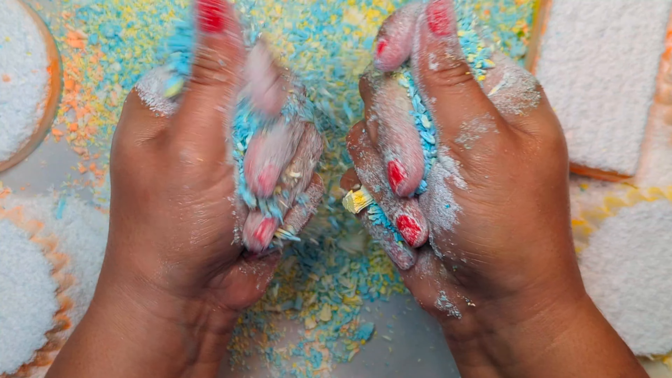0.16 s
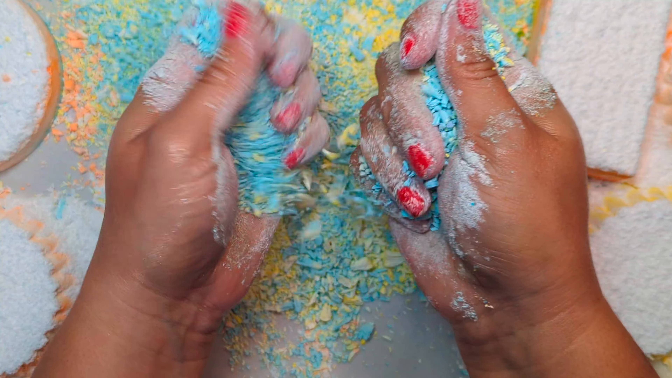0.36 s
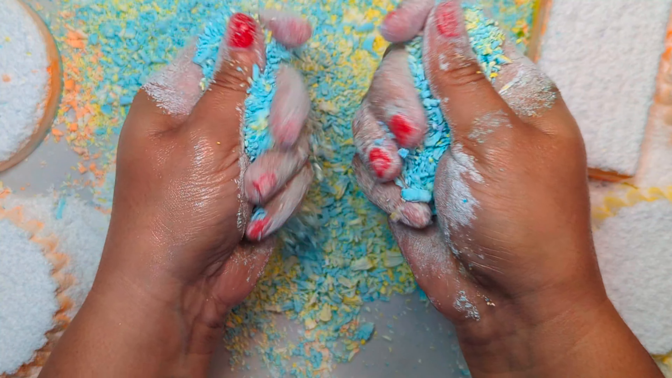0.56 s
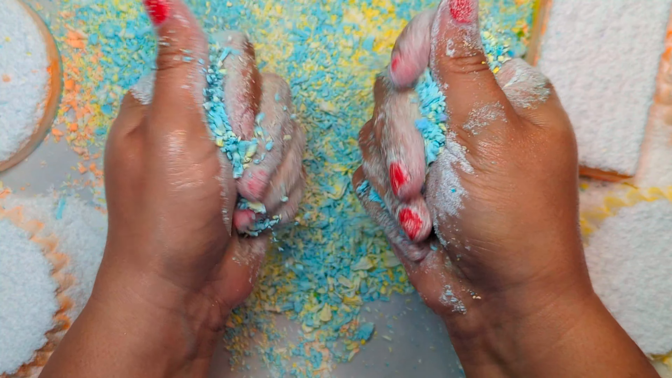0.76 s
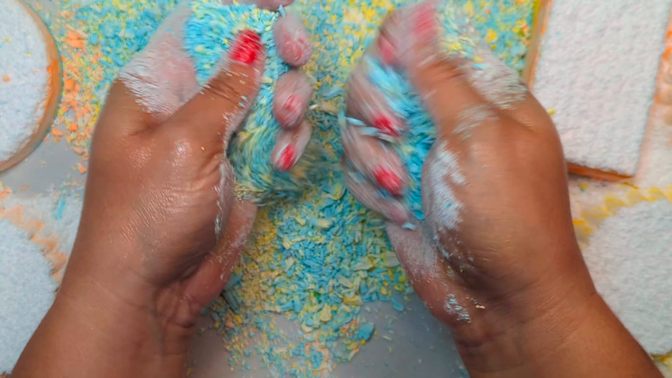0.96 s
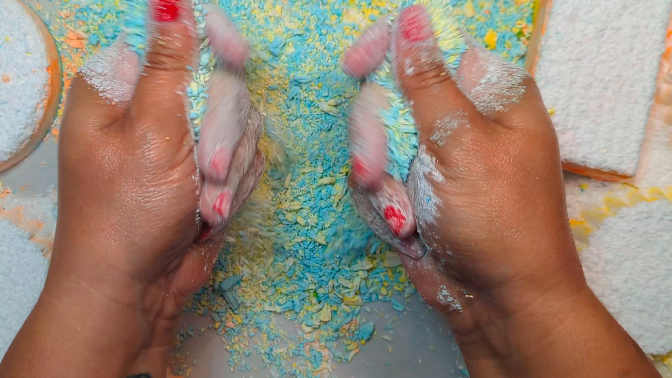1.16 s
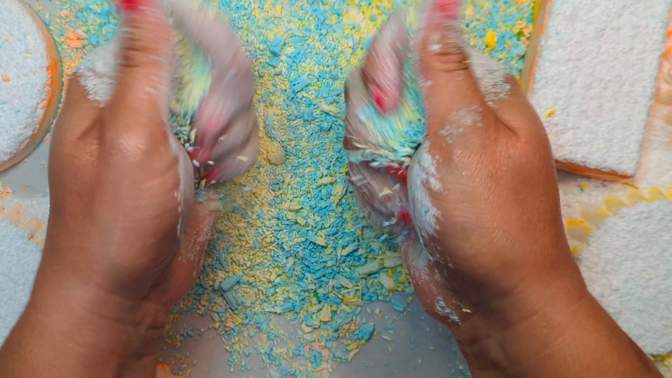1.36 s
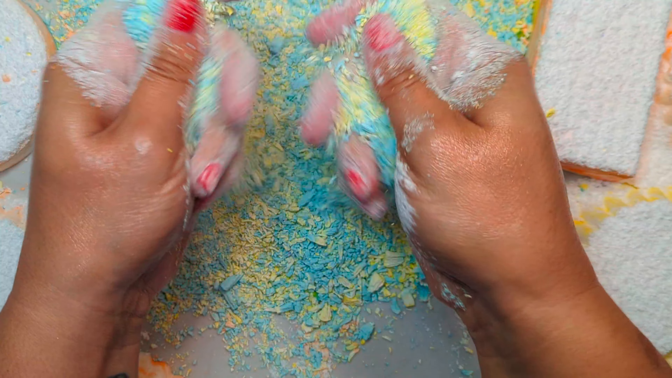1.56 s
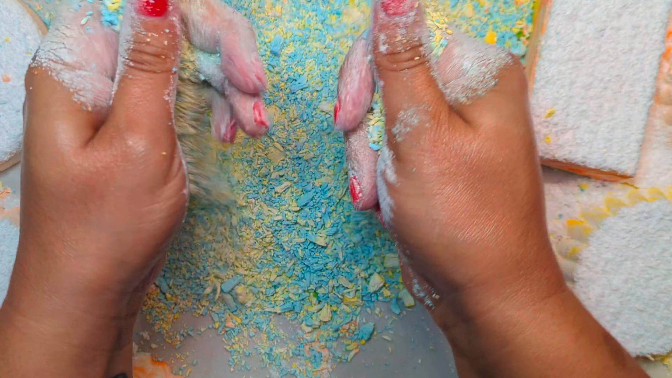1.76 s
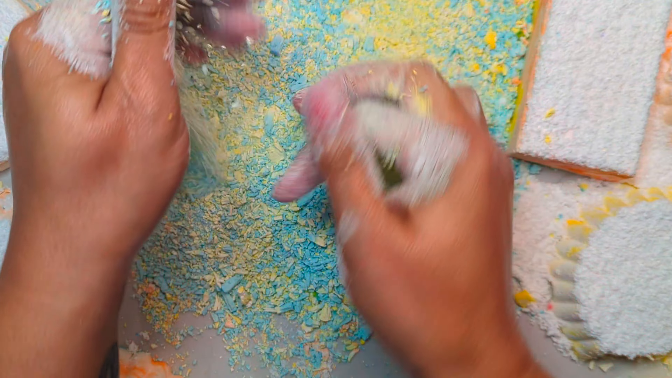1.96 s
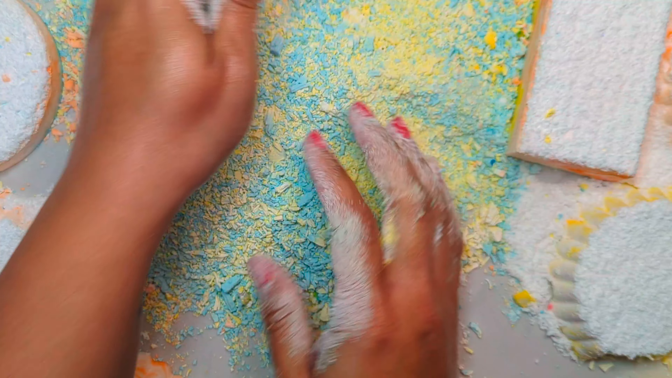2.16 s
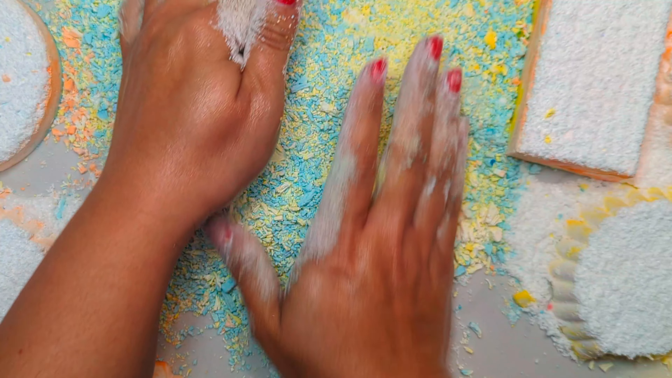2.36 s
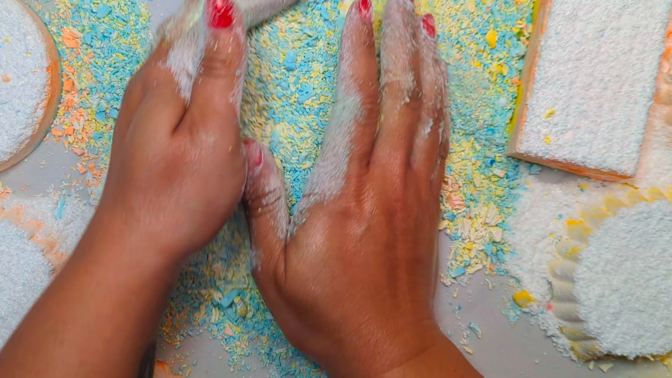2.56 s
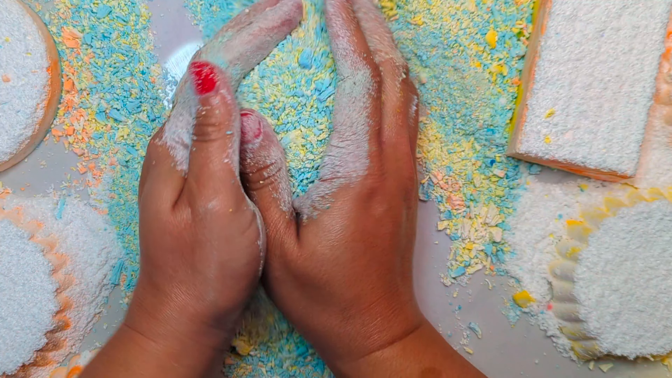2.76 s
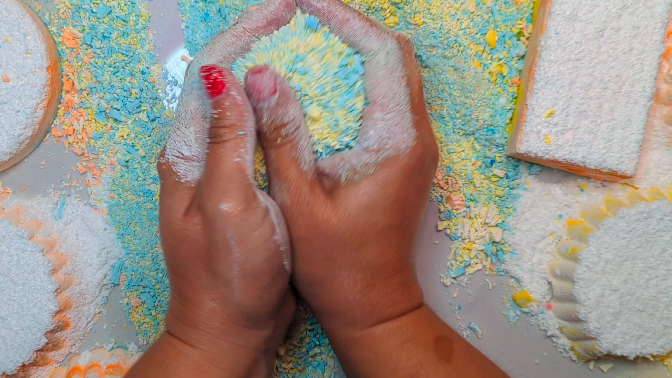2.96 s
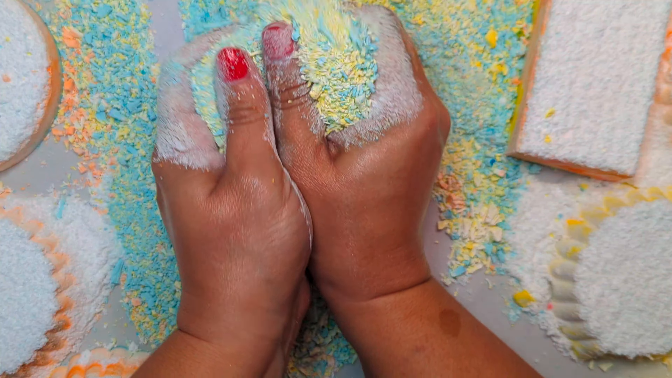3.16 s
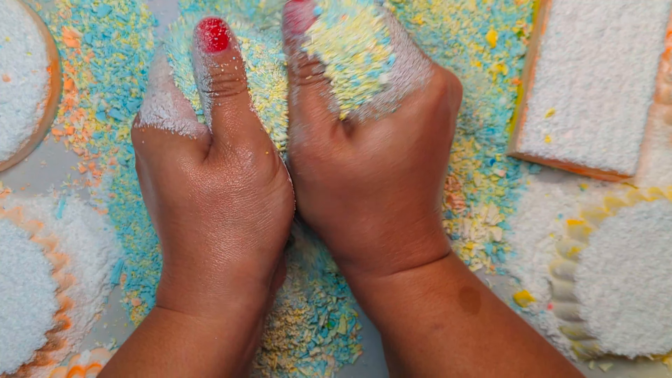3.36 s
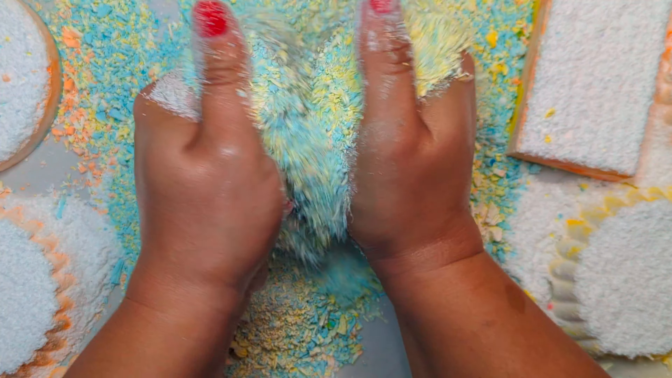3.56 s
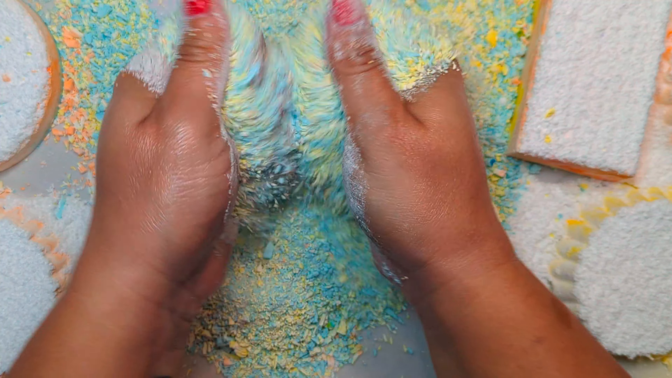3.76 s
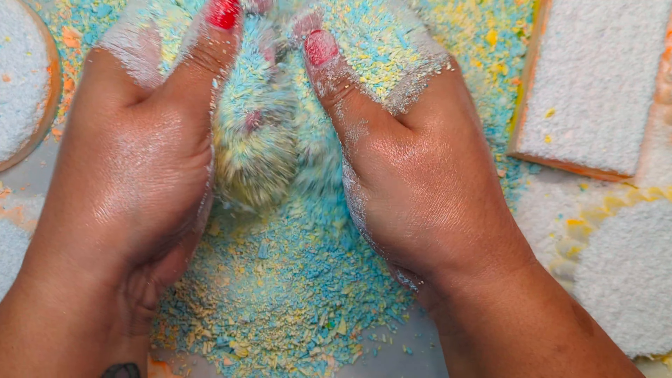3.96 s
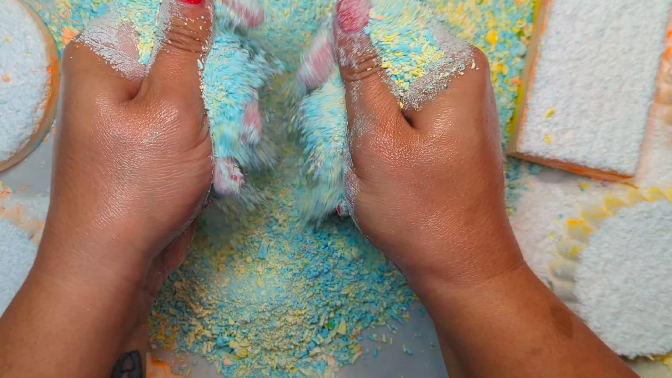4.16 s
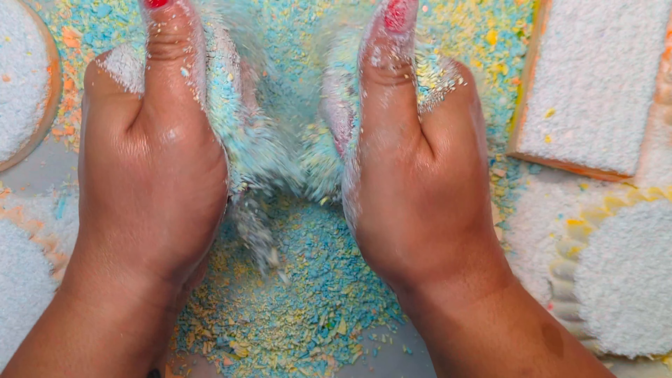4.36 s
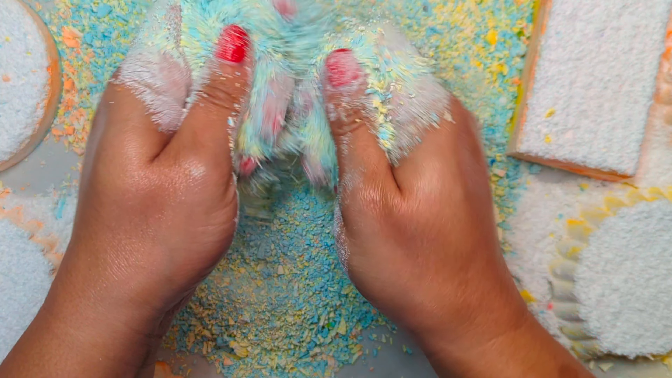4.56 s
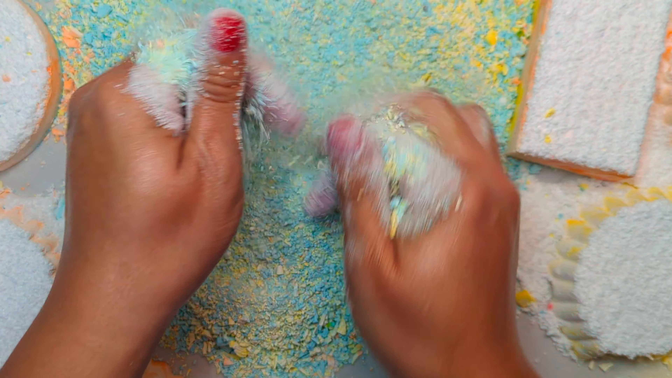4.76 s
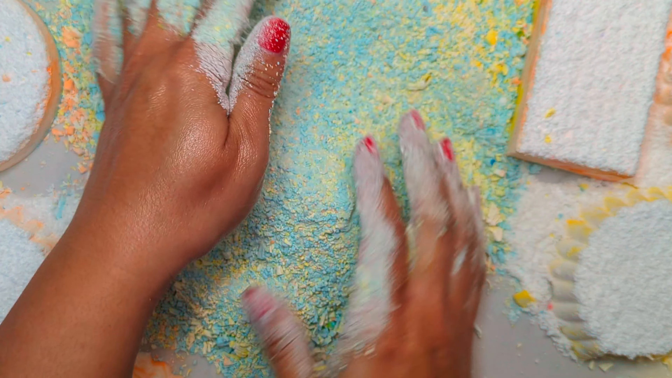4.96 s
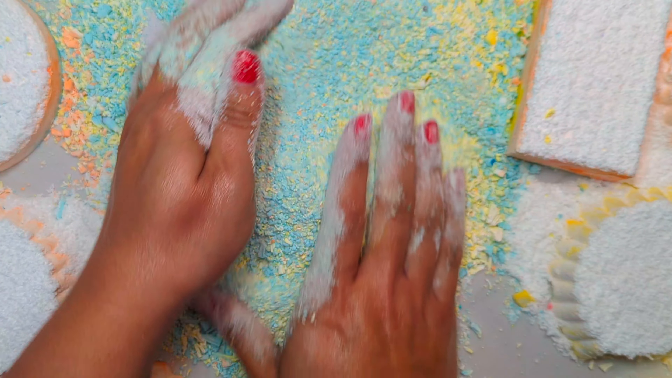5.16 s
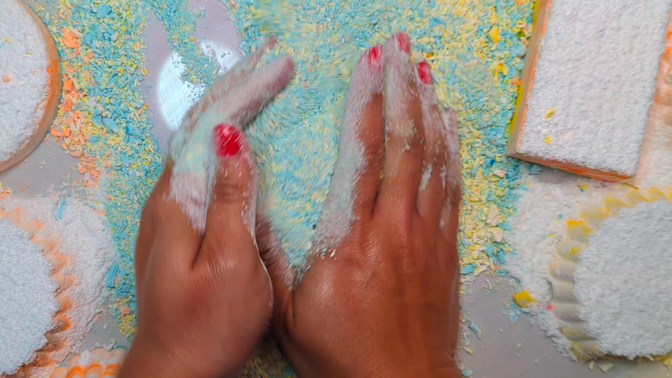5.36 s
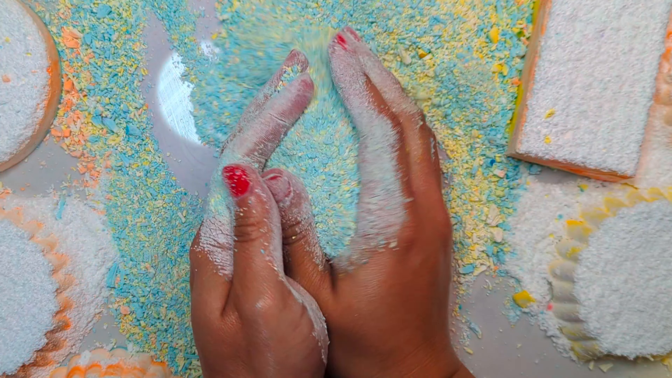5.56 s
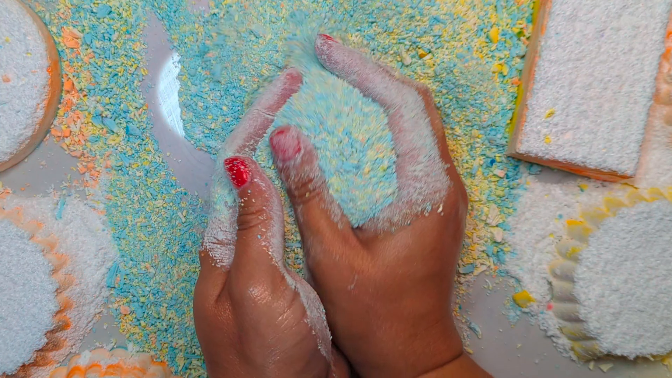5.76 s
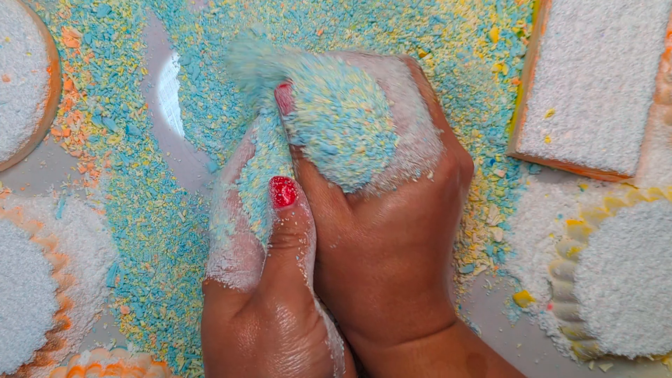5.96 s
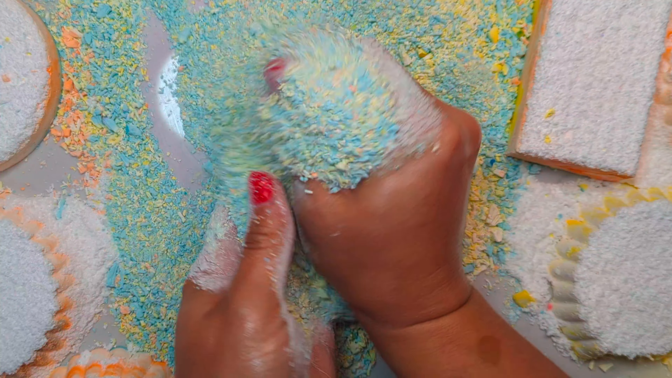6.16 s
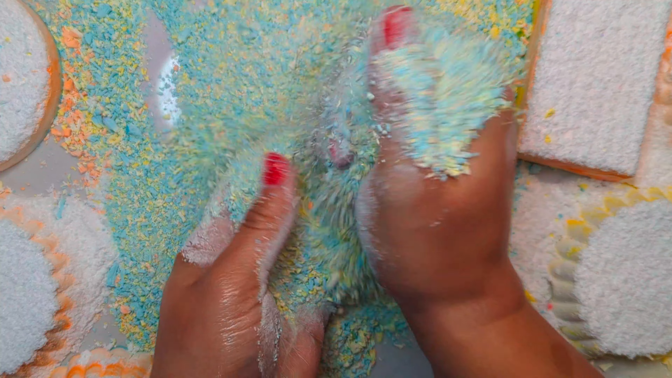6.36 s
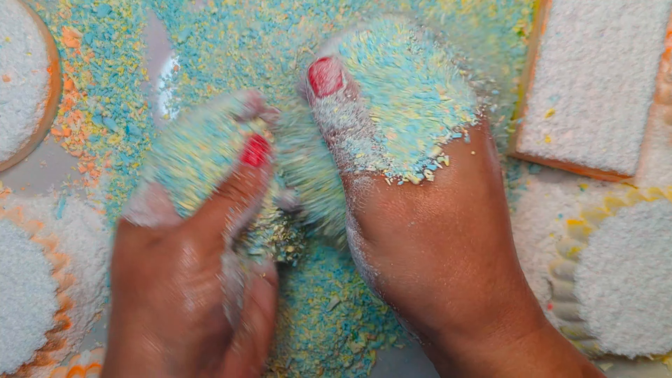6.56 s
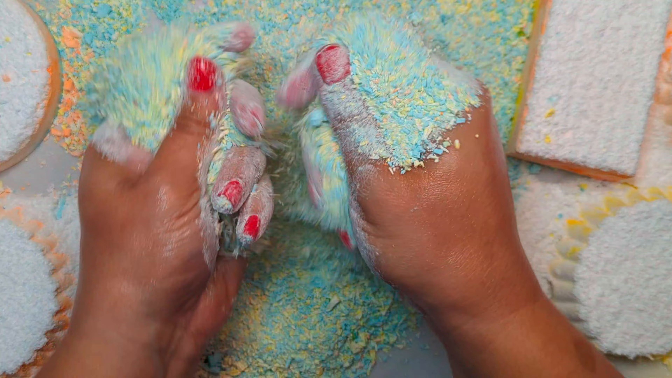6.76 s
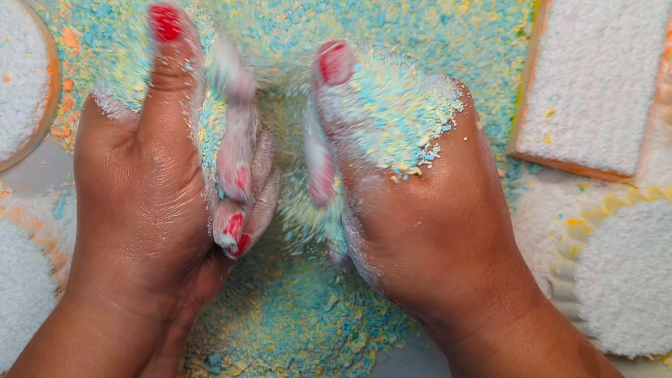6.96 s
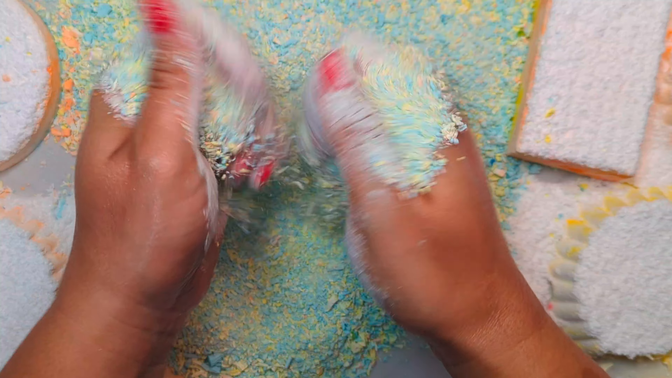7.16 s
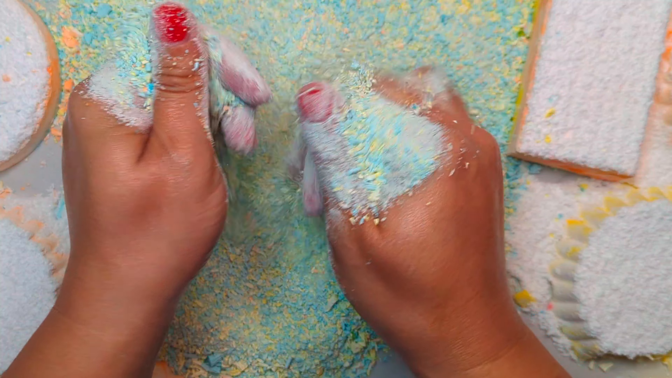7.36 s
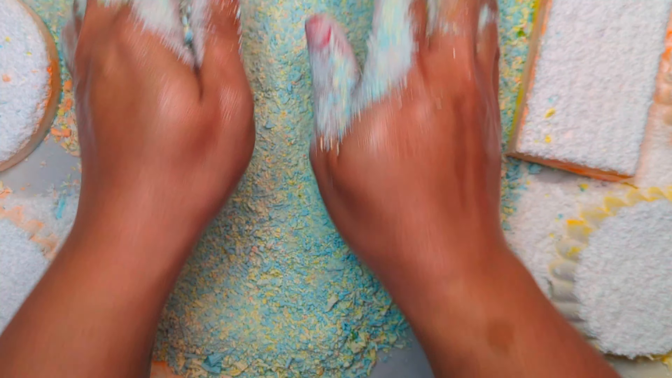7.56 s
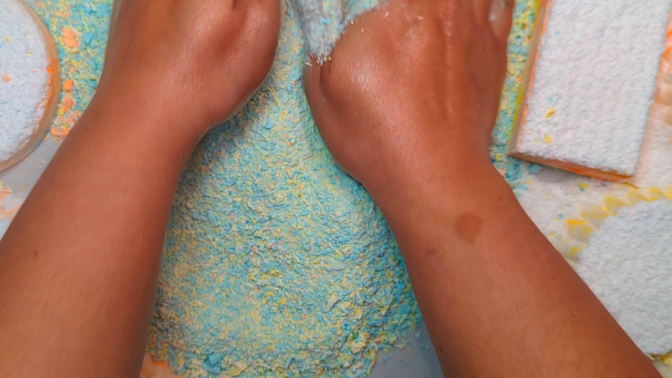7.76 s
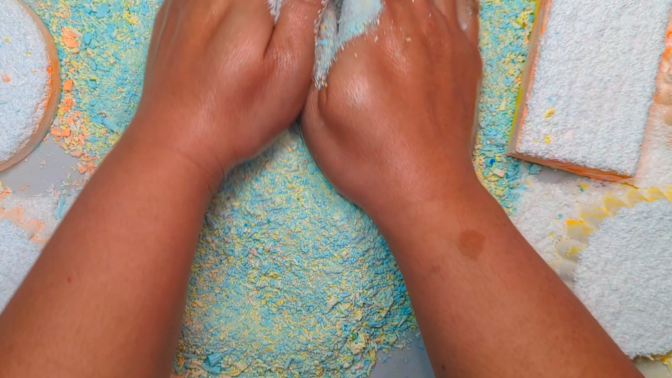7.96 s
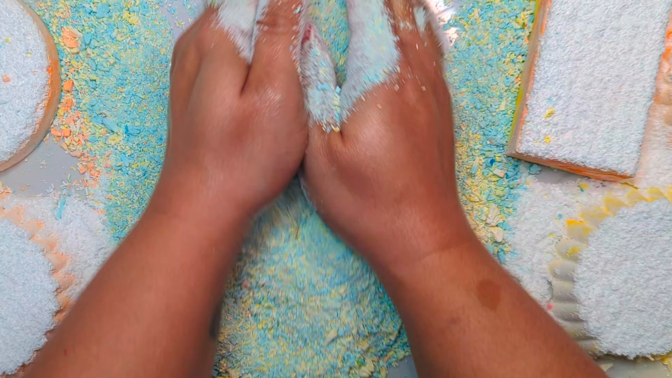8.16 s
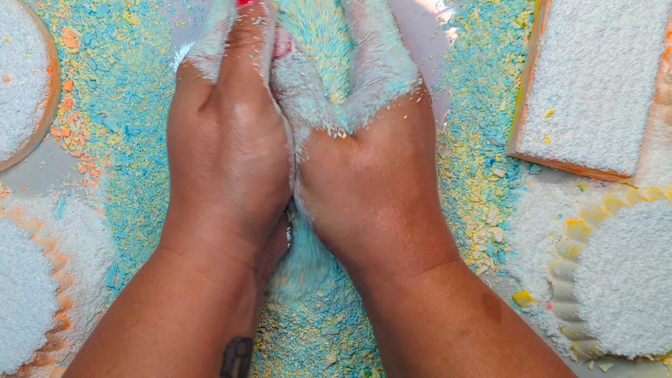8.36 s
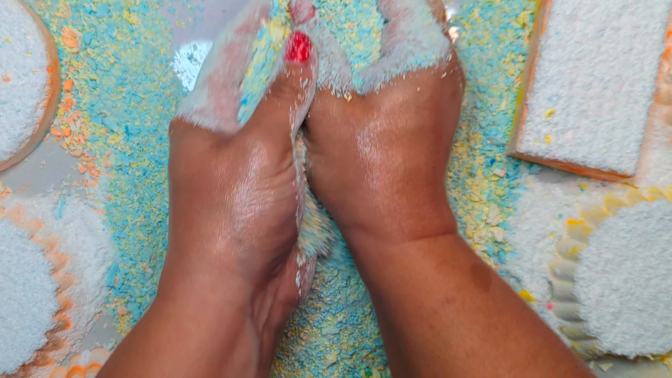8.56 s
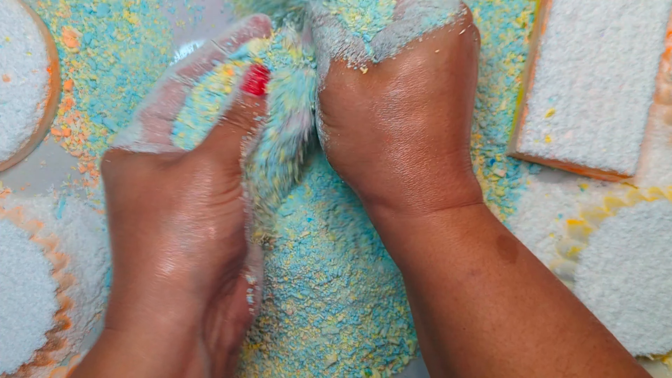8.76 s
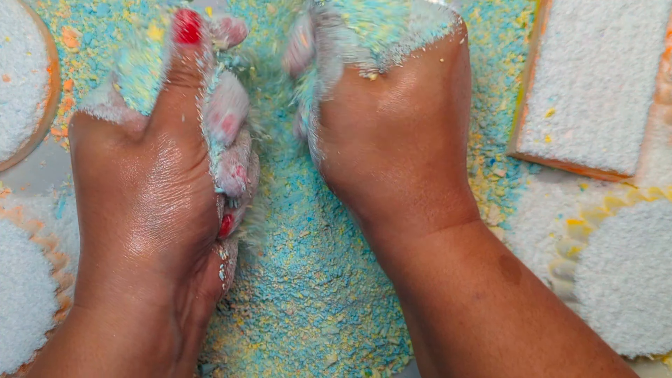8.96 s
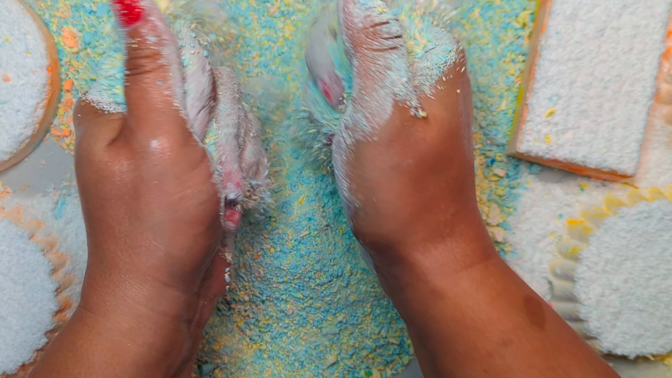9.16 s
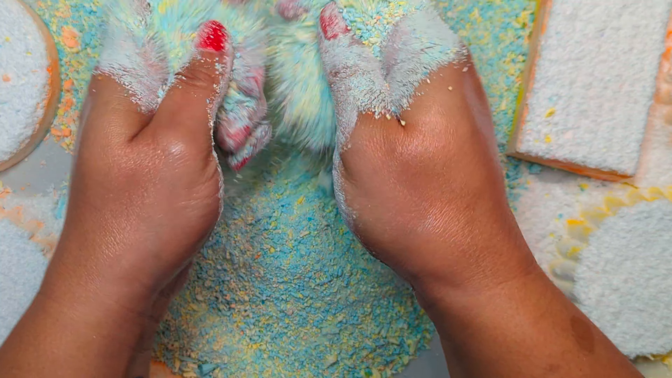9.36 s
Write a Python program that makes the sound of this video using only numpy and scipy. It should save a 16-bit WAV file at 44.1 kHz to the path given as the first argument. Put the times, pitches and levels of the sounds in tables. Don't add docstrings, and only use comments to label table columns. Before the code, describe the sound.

Two hands squeeze and crumble dry starch, dense gritty crunches and hissing powder pulsing in bursts between softer sweeping rustles, very close.

```python
import sys
import numpy as np
from scipy import signal
from scipy.fft import rfft, irfft, next_fast_len
from scipy.io import wavfile
from scipy.ndimage import uniform_filter1d, map_coordinates

SR = 44100
rng = np.random.default_rng(int(sys.argv[2]) if len(sys.argv) > 2 else 0)


def bounce(signal):
    frames = np.transpose(np.atleast_2d(signal))
    limited = np.clip(frames, -1, 1)
    pcm = np.round(limited * 32767).astype(np.int16)
    wavfile.write(sys.argv[1], SR, pcm)


def volts_from_db(level):
    exponent = np.asarray(level, float) / 20
    return 10 ** exponent


N = 414981

# [full force at
# t/s, rise/s, hold/s, fall/s, crumb level/dB]
MOVES = [(0.178, .4, .11, 0.17, -9), (0.424, 0.24, 0.023, 0.087, -17.5),
         (0.651, 0.11, 0.27, 0.13, -12.5), (1.0, 0.097, .01, .1, -20.5),
         (1.132, 0.063, 0.026, 0.22, -18), (1.257, 0.41, 0.075, 0.25, -11.5),
         (1.435, .2, 0.074, 0.084, -23.5), (1.659, 0.11, 0.11, 0.24, -15),
         (1.916, 0.039, 0.057, 0.14, -21.5), (3.483, 0.8, 0.12, 0.35, -8.5),
         (3.842, 0.065, 0.12, 0.19, -17.5), (4.136, .2, .26, .25, -12.5),
         (4.505, .2, 0.067, 0.054, -22.5), (4.676, 0.084, 0.09, 0.13, -14.5),
         (6.152, .7, 0.2, 0.17, -13), (6.585, 0.19, 0.045, 0.36, -21.5), (6.74, 0.054, .02, 0.14, -27),
         (6.803, 0.17, .32, 0.34, -13.5), (7.372, 0.061, 0.071, .12, -16), (8.628, 0.6, 0.15, 0.48, -21),
         (8.82, 0.047, .04, 0.35, -17), (8.95, 0.47, 0.3, 0.18, -12), (9.336, .2, 0.12, .2, -22.5),
         (0.54, .1, 0.039, .1, -26), (2.83, 0.14, 0.044, .2, -26.5), (5.128, 0.018, 0.0061, 0.018, -27),
           (7.49, 0.046, 0.037, .012, -24.5), (2.063, .1, .01, .7, -35.5), (2.363, .015, .15, 0.31, -32),
           (2.6, 0.22, 0.19, 0.34, -29.5), (4.895, 0.091, .01, 0.51, -32.5), (5.136, .02, .25, 0.34, -28.5),
           (5.59, 0.13, 0.14, 0.32, -27), (7.57, .1, .01, 0.47, -33.5), (7.855, 0.09, 0.14, 1.8, -27.5)]
SWING_DB, ROUNDNESS = 25, 1.16

# [t/s, cupping 0 open to 1 closed, powder level over crumbs/dB, crumb pitch f/Hz]
HANDS = [(0.0, 0.17, -7, 2520), (1.9, 0.059, -3.5, 2670), (2.1, 0.45, 1.5, 2950), (2.34, 0.24, -2, 2900),
         (2.4, 0.44, -10, 2660), (3.05, 0.92, -17, 1650), (3.65, 0.32, -9.5, 2750), (4.7, 0.57, -7.5, 2180),
         (4.88, 0.11, -0.5, 2740), (5.15, 0.46, -11.5, 2570), (5.95, 1.0, -21, 1610),
         (6.33, 0.51, -6, 2330), (7.45, 0.53, -9.5, 2450), (7.6, 0.13, -0.5, 2650), (7.86, 0.34, -13, 2320),
         (8.6, 1, -18.5, 1700), (8.82, 0.66, -10, 2560), (9.0, 0.44, -5.5, 2720)]
# [t/s, half width/s, extra powder level/dB]
PUFFS = [(0.26, .08, 1), (0.54, 0.036, 6), (0.75, .05, 3), (0.9, 0.043, -3), (0.99, 0.024, 3),
         (1.37, 0.051, 3.5), (1.52, .03, -3.5), (1.67, 0.058, 4), (1.83, 0.023, 5), (1.99, 0.037, 5.5),
         (2.08, 0.042, 2.5), (3.93, 0.049, 2.5), (4.43, 0.088, 3), (4.62, 0.022, 4.5), (4.78, 0.069, 4.5),
         (5.135, 0.012, 10), (6.13, 0.029, 1), (6.38, 0.07, 1), (6.52, .04, 3), (7.13, .08, 2.5),
         (7.32, .03, 2), (7.44, 0.063, 8), (9.26, 0.042, 1.5)]

# [pitch f/Hz (or ratio to a moving pitch), pitch spread/log,
# life/cycles, rate/grains per s, size spread/dB]
LUMPS = (.85, .38, 2.4, 1900, 1.5)
CRUMBS = (1, .42, 1.7, 6500, 2.0)
GRIT = (6400, .29, 1.6, 11000, 2.3)
DUST = (11500, .22, 1.6, 13000, 2.6)
CAVITY = (1, .11, 5, 1500, 1.5)

LUMPS_OPEN_DB, LUMPS_CUP_DB, LUMPS_REST_DB = -17, 18, -54
LUMPS_HZ, LUMPS_CUP_HZ = 948.5, 231
COARSE_HZ, CRUSH_S = 520, 1.1
GRIT_DB, GRIT_FOLLOWS = -1.67, 0.23
GRIT_LAG_S, DUST_LAG_S = 0.0036, 0.0083
GRIT_FINER_DB, DUST_FINER_DB = 0, 0.5

# [f/Hz, level/dB]
HOLLOW = [(120, -12), (200, -5), (265, -11), (310, -3.5), (465, -8.5), (550, -5), (820, -1), (990, 0),
          (1220, 5), (1700, -16), (3000, -9.5)]
# [f/Hz, level/dB]
TABLE = [(300, -38), (700, -11), (960, -15.5), (1130, -1), (1600, -1), (2600, 1.5), (3700, 2), (4400, -1),
         (5300, 0), (6200, 2), (7200, -4), (8600, -4.5), (12700, -8), (15500, -11.5)]
# [f/Hz, level/dB]
SWEEP = [(120, -39), (200, -13), (516, 4.5), (784, -23), (940, -6.5), (1780, -9.5), (2340, -9.5),
         (2700, -7), (3430, -4.5), (3690, -2.5), (4040, -2.5), (8070, 4.5), (15500, -5.5)]

# [f/Hz, t60/s]
ROOM = [(300, 0.6), (2000, 0.2), (12000, 0.32)]
BOUNCE_S, BOUNCE_DB = 0.000347, -22.5
# [f/Hz, level/dB]
HUM = [(12, -29), (20, -0.5), (54, -2), (80, -3.5), (103, -1), (123, -1), (156, -5.5), (400, -11.5),
       (520, -51), (880, -120)]
# [f/Hz, level/dB]
HISS = [(300, 5), (3000, -7), (10000, -2), (15500, -10)]
# [t/s, level/dB]
BUMPS = [(0.2, -33), (0.95, -45), (1.83, -35), (3.5, -40), (4.72, -37), (5.19, -42), (6.37, -42),
         (7.44, -38), (8.35, -35), (8.831, -29.5), (9.2, -36)]
STILL_DB, SHAKE_DB, SHAKE_FOLLOWS, BUMP_S = -40.5, -30.5, 0.53, 0.16

# [t/s, peak level/dB, pitch f/Hz, t60/s]
SNAPS = [(2.0694, -12, 6340, 0.05), (2.144, -24, 6680, 0.054), (2.214, -16, 6300, 0.042),
         (2.2448, -12, 7900, 0.075), (2.2674, -21, 7150, 0.055), (2.3047, -19, 7900, 0.05),
         (3.173, -16, 2720, 0.05), (5.1891, -11, 6500, 0.05), (5.3672, -12, 6520, 0.05),
         (5.533, -4.5, 3600, 0.047), (5.585, -6, 4620, 0.084), (5.64, -7, 3060, 0.06),
         (5.7026, -6, 3150, 0.063), (6.7306, -16, 2650, 0.05), (7.7584, -17, 2840, 0.041)]
# [t/s, peak level/dB, pitch f/Hz]
TICKS = [(2.0694, -19, 6350), (2.0784, -21, 5870), (2.143, -22, 6680), (2.357, -13, 9000),
         (5.0734, -33, 11500), (5.0776, -31.5, 7560), (5.2074, -24.5, 5520), (5.5313, -19, 6270),
         (5.5857, -21, 4620), (5.7024, -25, 5860), (7.5404, -16, 5840), (7.5874, -19, 6160),
         (7.7514, -25, 6170)]
# [middle t/s, half length/s, pitch f/Hz, climb/Hz per s, level over crumbs/dB]
SCOOPS = [
    (3.243, 0.29, 678, 500, -8.5),
    (6.066, 0.11, 650, 910, -5),
    (8.717, 0.17, 594, 253, -5.5),
]
SECOND_MODE, SECOND_DB = 1.9, -5.5


def unit(x):
    return x / np.sqrt(np.mean(x ** 2) + 1e-20)


def even(x):
    power = np.abs(uniform_filter1d(x ** 2, SR // 4))
    return x / np.sqrt(power + 1e-12)


def along(points, hz):
    f, value = np.transpose(points)
    return np.interp(np.log(hz + 1), np.log(f + 1), value)


def curves(rows):
    s, *columns = np.transpose(rows)
    return [np.interp(np.arange(N) / SR, s, column) for column in columns]


def wobble(rate):
    knots = rng.standard_normal(int(N * rate / SR) + 4)
    return map_coordinates(knots, [np.arange(N) * rate / SR])


def together(levels_db):
    return 10 * np.log10(sum(volts_from_db(2 * db) for db in levels_db) + 1e-12)


def coloured(x, spectrum):
    m = 2 * next_fast_len(N // 2 + 4096)
    gain = volts_from_db(along(spectrum, np.fft.rfftfreq(m, 1 / SR)))
    cepstrum = irfft(np.log(gain + 1e-6), m)
    cepstrum[1:m // 2] *= 2
    cepstrum[m // 2 + 1:] = 0
    return irfft(rfft(x, m) * np.exp(rfft(cepstrum)), m)[:N]


def effort(lag_s, finer_db=0):
    t = np.arange(0, N / SR + .01, .002)
    s, rise, hold, fall, db = np.transpose(MOVES)[:, :, None]
    away = np.maximum(np.maximum((s - t) / rise, (t - s - hold) / fall), 0)
    progress = np.clip((t - s) / np.maximum(hold, .05), 0, 1) - .5
    level_db = together(db - SWING_DB * away ** ROUNDNESS + finer_db * progress)
    return np.interp(np.arange(N) / SR - lag_s, t, level_db)


def grains(hz, spread, cycles, rate, size_db, glide):
    draw = rng.random((int(rate * N / SR), 2))
    start = (draw[:, :1] * N).astype(int)
    pitch = hz * glide[start] * np.exp(spread * rng.standard_normal(start.shape))
    pitch = np.minimum(pitch, SR / 2.5)
    size = volts_from_db(-size_db * np.log(draw[:, 1:] + 1e-3))
    k = np.arange(int(5 * SR * cycles / (hz * np.mean(glide))))
    turns = k * pitch / SR
    ring = size * turns * np.exp(-2 * turns / cycles) * np.sin(2 * np.pi * turns)
    return np.bincount((start + k).ravel(), ring.ravel(), N + len(k))[:N]


def lumps(crumbs_db, cup):
    level_db = together([crumbs_db + LUMPS_OPEN_DB + LUMPS_CUP_DB * cup, LUMPS_REST_DB])
    thuds = grains(*LUMPS, LUMPS_HZ - LUMPS_CUP_HZ * cup)
    return volts_from_db(level_db + 0.18 * wobble(25)) * even(coloured(thuds, HOLLOW))


def shower(size, level_db, glide, falling):
    raw = grains(*size, glide)
    rain = even(coloured(raw, TABLE))
    sweep = even(coloured(raw, SWEEP))
    return volts_from_db(level_db + 0.65 * wobble(25)) * (falling * rain + (1 - falling) * sweep)


def heap():
    t = np.arange(N) / SR
    crumbs_db = effort(0)
    cup, powder_db, crumbs_hz = curves(HANDS)
    for s, half, db in PUFFS:
        powder_db = powder_db + db * np.exp(-((t - s) / half) ** 2)
    crumbs_hz = crumbs_hz - COARSE_HZ * np.exp(-t / CRUSH_S)
    grit_db = effort(GRIT_LAG_S, GRIT_FINER_DB) + GRIT_DB + GRIT_FOLLOWS * powder_db
    dust_db = effort(DUST_LAG_S, DUST_FINER_DB) + powder_db
    falling = np.clip((crumbs_db + 30.5) / 9.8, 0, 1)
    total = lumps(crumbs_db, cup)
    total = total + shower(CRUMBS, crumbs_db, crumbs_hz, falling)
    total = total + shower(GRIT, grit_db, np.ones(N), falling)
    total = total + shower(DUST, dust_db, np.ones(N), falling)
    slips_db = 0.11 * wobble(20) + 0.78 * wobble(45) + 0.49 * wobble(150)
    return volts_from_db(slips_db) * (total + cavity())


def room(x):
    out, step = np.zeros(N + SR), SR // 4
    for at in range(0, N, step):
        hz, t, z = signal.stft(rng.standard_normal(SR // 4), SR, nperseg=256)
        decay = volts_from_db(-60 * t / along(ROOM, hz)[:, None])
        tail = signal.istft(z * decay, SR, nperseg=256)[1]
        echo = signal.fftconvolve(x[at:at + step], tail / np.linalg.norm(tail))
        out[at + 220:][:len(echo)] += echo
    return out[:N]


def rumble():
    hiss = volts_from_db(-40) * unit(coloured(rng.standard_normal(N), HISS))
    hum = unit(coloured(rng.standard_normal(N), HUM))
    t = np.arange(N) / SR
    bumps_db = [db - 10 * ((t - s) / BUMP_S) ** 2 for s, db in BUMPS]
    shake_db = together([STILL_DB, SHAKE_DB + SHAKE_FOLLOWS * effort(0)] + bumps_db)
    return hiss + volts_from_db(shake_db + wobble(5)) * hum


def burst(pitch_hz, t60, rise, breadth, top_hz):
    t = np.arange(SR // 10) / SR
    hz = np.fft.rfftfreq(len(t), 1 / SR)
    puff = rng.standard_normal(len(t)) * volts_from_db(-60 * t / t60) * (1 - np.exp(-t / rise))
    damping = 1j * hz * breadth * pitch_hz
    body = damping / (pitch_hz ** 2 - hz ** 2 + damping)
    soft = 1 / (1 - (hz / top_hz) ** 2 + 1.3j * hz / top_hz)
    out = irfft(rfft(puff) * (body * soft) ** 2, len(t))
    return out / np.max(np.abs(out))


def snaps():
    out = np.zeros(N + SR)
    for s, db, pitch_hz, t60 in SNAPS:
        snap = burst(pitch_hz, t60, rise=0.0003, breadth=3.4, top_hz=8800)
        out[round(s * SR):][:SR // 10] += volts_from_db(db - 5.0) * snap
    for s, db, pitch_hz in TICKS:
        tick = burst(pitch_hz, 0.0034, rise=.0001, breadth=1.5, top_hz=15000)
        out[round(s * SR):][:SR // 10] += volts_from_db(db - 3.0) * tick
    return out[:N]


def cavity():
    t = np.arange(N) / SR
    s, half, hz, climb, db = np.transpose(SCOOPS)
    near = np.argmin(np.abs(t - s[:, None]), axis=0)
    away = np.clip((t - s[near]) / half[near], -2, 2)
    pitch = hz[near] + climb[near] * half[near] * away
    ring = even(grains(*CAVITY, pitch))
    ring = ring + volts_from_db(SECOND_DB) * even(grains(*CAVITY, SECOND_MODE * pitch))
    return volts_from_db(effort(0) + db[near] - 7.2 * away ** 4 + 0.5 * wobble(14)) * ring


def scene():
    starch = heap() + snaps()
    late = np.pad(starch, (round(BOUNCE_S * SR), 0))[:N]
    mono = starch + volts_from_db(BOUNCE_DB) * late + volts_from_db(-14) * room(starch) + rumble()
    return np.array([mono, mono])


def roll_off(x):
    return signal.sosfilt(signal.butter(12, 15770, fs=SR, output="sos"), x)


def record(dry):
    x = dry + .003
    x = x / (1 + np.abs(x / .99) ** 16) ** (1 / 16)
    return roll_off(x)


dry = scene()
out = record(dry)
bounce(out)
```